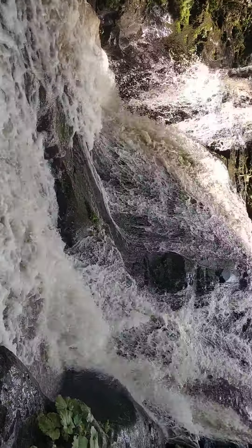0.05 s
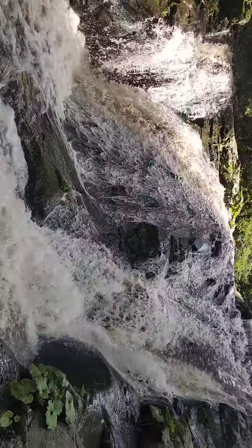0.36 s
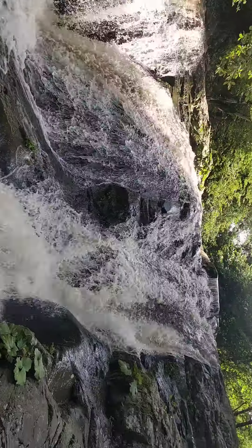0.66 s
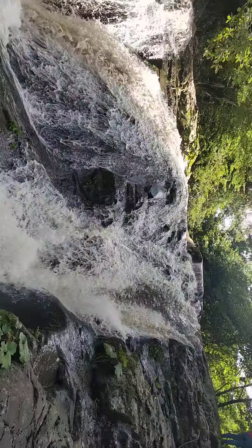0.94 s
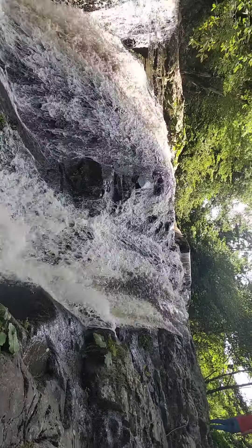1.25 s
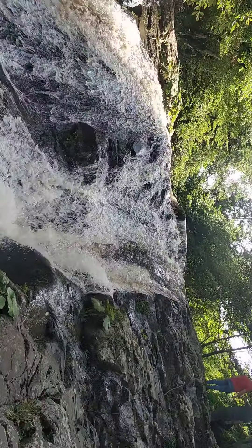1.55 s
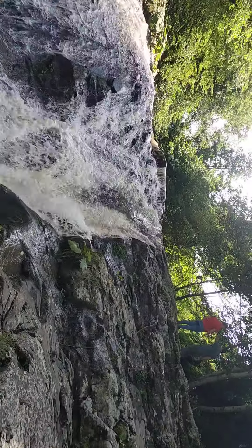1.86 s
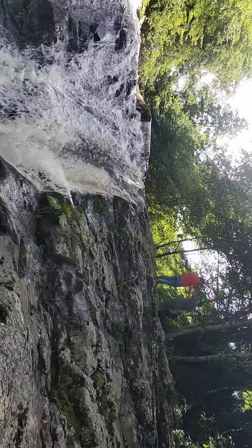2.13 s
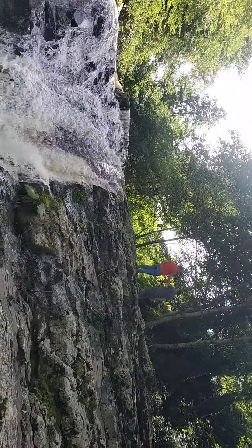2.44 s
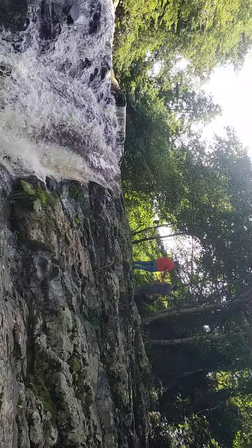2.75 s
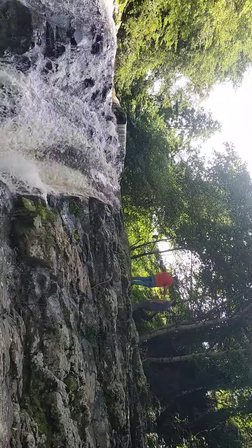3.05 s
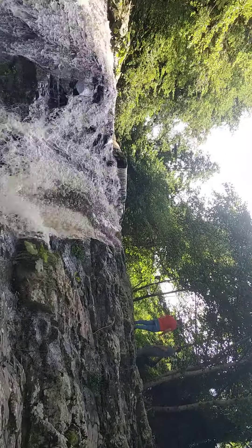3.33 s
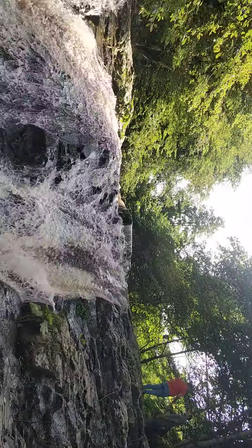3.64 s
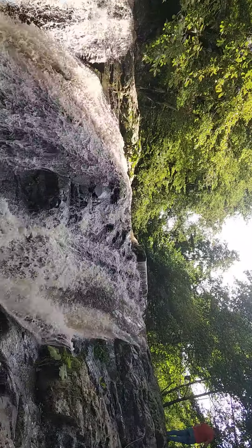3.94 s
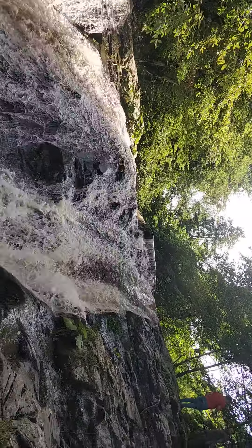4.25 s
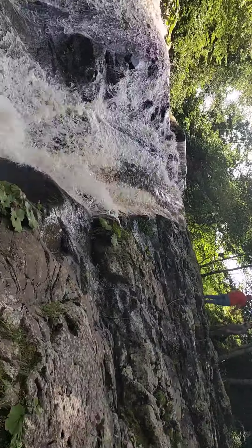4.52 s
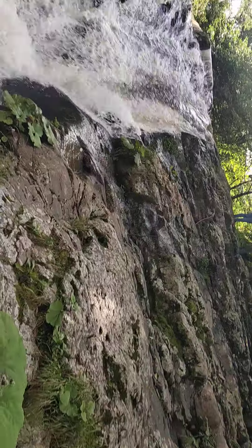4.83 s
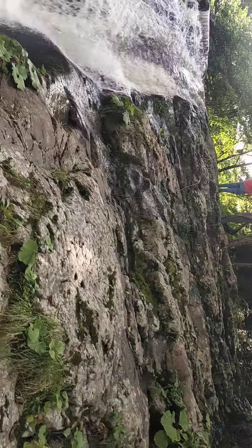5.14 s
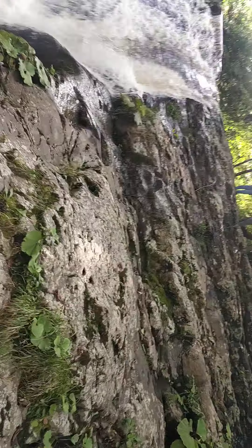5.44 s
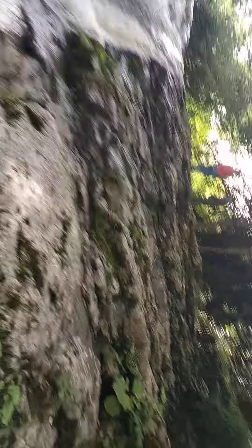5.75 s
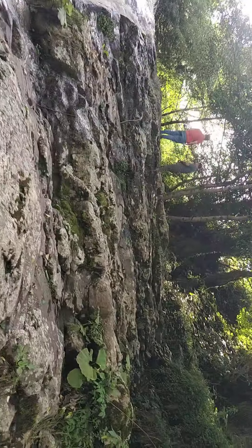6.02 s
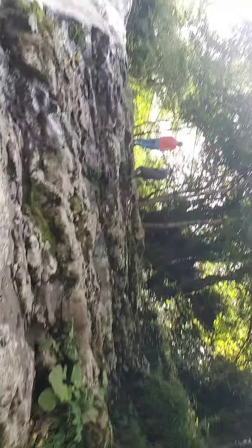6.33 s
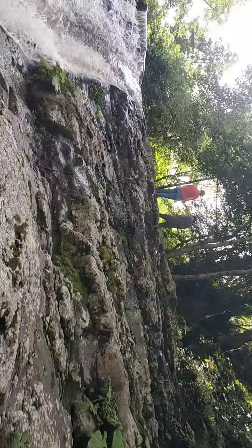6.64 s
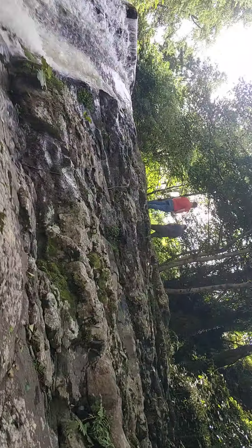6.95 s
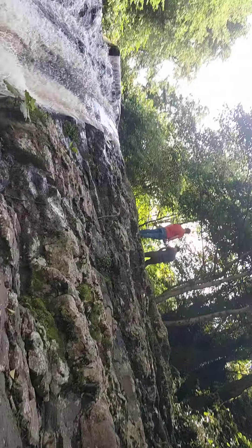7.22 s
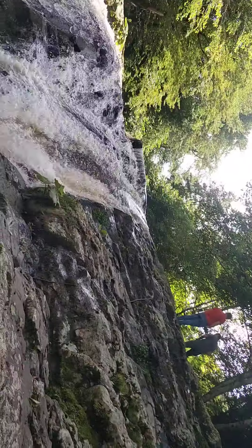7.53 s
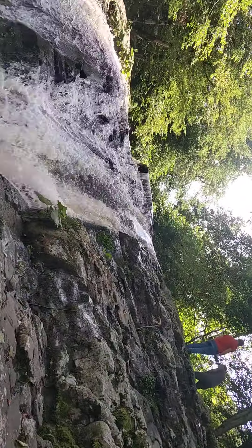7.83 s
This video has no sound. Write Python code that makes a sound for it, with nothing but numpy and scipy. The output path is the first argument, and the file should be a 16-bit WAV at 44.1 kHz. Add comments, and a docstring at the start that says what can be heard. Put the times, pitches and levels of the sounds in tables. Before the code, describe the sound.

A close waterfall rushes over rock ledges from the first moment and runs without a break for about eight seconds. Underneath, the plunge pool gives a low, uneven rumble. In the middle, foam rushes with many small bubbles, and on top, droplets hitting the rock make a bright, wide sizzle of spray.

The hand-held microphone pans, gently changing the tone. The rush is fullest and brightest until about 1.7 seconds, eases between 2 and 3 seconds, brightens again near 3.8 seconds, then softens as the microphone turns away. At about 5.4 seconds a hand slips and shades the microphone: the middle of the rush drops a little, leaving a thinner, slightly hollow sound with the hiss still present to the end. A faint burble runs through the water throughout.

```python
"""A close, bright rush of water, steady from the first moment: a waterfall pouring over rock ledges.
Underneath, big air pockets boom in the plunge pool; a sheet of foam rushes with small bubbles,
and on top, droplets slapping the rock make a wide sizzle of spray. The rush brightens whenever the
panning, hand-held microphone faces the fall; late on, the hand slips and shades it.
A mild noise suppressor adds a slight burble."""
import sys
import numpy as np
from scipy import signal
from scipy.fft import rfft, irfft
from scipy.io import wavfile
from scipy.ndimage import uniform_filter1d

SR = 44100
rng = np.random.default_rng(int(sys.argv[2]) if len(sys.argv) > 2 else 0)


def wav_record(signal):
    """Record a signal, one row per channel, as 16-bit PCM in the file named by sys.argv[1]."""
    frames = np.transpose(np.atleast_2d(signal))
    bounded = np.clip(frames, -1, 1)
    # unit amplitude maps onto the largest positive 16-bit level
    quanta = np.round(bounded * 32767).astype(np.int16)
    wavfile.write(sys.argv[1], SR, quanta)


N = 347508

# The water's tone at an open microphone. Each row: frequency in Hz, relative level in dB.
OPEN_TONE = [(450, -7), (700, -6), (1050, -6.5), (1500, -5), (2000, -2.5), (2400, -4.5), (2800, -9),
             (3500, -10), (4500, -6), (5500, -2.5), (6300, -2), (6950, -4), (8200, 0), (9400, -1)]
# Its tone with the hand shading the microphone. Each row: frequency in Hz, relative level in dB.
SHADED_TONE = [(450, 0), (660, -7.5), (950, -8), (1500, -9), (2300, -8.5), (3400, -8.5), (4500, -3.5),
               (6000, -1), (7000, -4), (8400, 2), (9400, 1.5)]
# The microphone's low bump and roll-off at both ends. Each row: frequency in Hz, gain in dB.
MIC_RESPONSE = [(25, -53), (45, -46), (70, -37), (100, -31), (130, -22), (165, -11), (200, 7.5), (235, 0),
                (285, -0.5), (9400, 0), (9900, -5.5), (10400, -14.5), (11000, -31)]
# Stereo spread of the spray. Each row: frequency in Hz, side level against mid in dB.
SPRAY_WIDTH = [(3700, -62), (4150, -22), (5400, -15.5), (6000, -10.5), (7500, -7), (9600, -8.5),
               (10500, -16)]
# How squarely the microphone faces the fall. Each row: time in seconds, share from 0 to 1.
MIC_FACING = [(0, 0.95), (0.6, 0.95), (1.75, 0.85), (2.25, 0.44), (3.2, 0.46), (3.75, 0.8), (4.3, 0.62),
              (4.9, 0.25), (6.2, 0), (7.88, 0.12)]
# The hollow between hand and housing rings. Each row: time in seconds, pitch in Hz, lift in dB.
CUP_RING = [(0, 710, 3), (2.0, 720, 2), (3.0, 690, 1.3), (4.1, 700, 1.2), (4.3, 910, 2.5), (4.55, 1170, 4),
            (5.2, 1220, 2), (6.4, 1090, 0.2), (7.88, 895, 2.5)]
# Sound glancing off the hand cancels a band, which drops as the hand closes in.
# Each row: time in seconds, centre in Hz, gain in dB.
HAND_NOTCH = [(0, 3600, -1.5), (2.3, 3620, -4), (3.8, 3480, -2.4), (4.4, 3350, -5.5), (5.15, 3280, -3.6),
              (5.26, 4320, -4.5), (5.35, 3930, -5.5), (5.41, 2020, -5), (5.62, 1880, -5.5),
              (5.85, 1900, 0.7), (6.6, 1490, -2), (7.88, 2310, -1.5)]
# The fader ride on the pool's boom. Each row: time in seconds, base level in dB.
BOOM_LEVEL = [(0, -28.5), (0.6, -32), (1.6, -31), (2.6, -33), (3.9, -31.5), (4.7, -30.5), (6.1, -30.5),
              (6.75, -32.5), (7.88, -31.5)]

FRAME, HOP = 1024, 128  # samples
HZ = np.fft.rfftfreq(FRAME, 1 / SR)
TIMES = np.arange(-(-N // HOP) + 1) * HOP / SR

FOAM_BASE_DB, FOAM_FACING_DB, FOAM_SHADED_DB = -24.5, 2, -2.3
SPRAY_BASE_DB, SPRAY_FACING_DB = -22.5, 3.3
SIZZLE_HZ, SIZZLE_FACING_DB = 8400, 3.5  # the finest spray is the most directional
HEAVE_DB, HEAVE_RATE_HZ = 1, 9.4  # the pool heaves at random
SLIP_AT_S, SLIP_EASE_S, SHADE_BEFORE_SLIP = 5.37, 0.012, 0.28
CUP_DIP_RATIO, CUP_DIP_DEPTH = 0.58, 1.5  # a dip below the ring, as multiples of its pitch and lift
NOTCH_LIFT_RATIO, NOTCH_LIFT_SHARE = 1.65, 0.3  # the reflection also lifts a band above its notch


def gain_of(db):
    """Decibels to amplitude."""
    return 10 ** (np.asarray(db) / 20)


def unit_rms(x):
    """Scales to rms 1."""
    return x / np.sqrt(np.mean(x ** 2) + 1e-20)


def over_hz(points):
    """A tone table read at every bin."""
    hz, value = np.transpose(points)
    return np.interp(np.log(HZ + 1), np.log(hz + 1), value)


def over_time(rows):
    """The columns of an automation table, read at every frame."""
    seconds, *columns = np.transpose(rows)
    return [np.interp(TIMES, seconds, column)[:, None] for column in columns]


def spectra(x):
    """Short-time spectra, frames x bins."""
    return signal.stft(x, nperseg=FRAME, noverlap=FRAME - HOP)[2].T


def waveform(channels):
    """Spectra, channels x frames x bins, back to sound."""
    return signal.istft(channels.transpose(0, 2, 1), nperseg=FRAME, noverlap=FRAME - HOP)[1][:, :N]


def bell(centre_hz, db, octaves):
    """One EQ peak or dip, in dB."""
    return db * np.exp(-.5 * (np.log2((HZ + 1) / centre_hz) / octaves) ** 2)


def below(edge_hz, order):
    """Share of the power that lies under a soft crossover."""
    return 1 / (1 + (HZ / edge_hz) ** order)


def band_gain(path, share, level_db):
    """One band of the path, scaled so that white noise comes out at the given level."""
    gain = path * np.sqrt(share)
    return gain * gain_of(level_db) / np.sqrt(np.mean(gain ** 2, axis=1, keepdims=True))


def surge(rate_hz):
    """A random swell of rms 1, with little movement faster than the given rate."""
    hz = np.fft.rfftfreq(len(TIMES), HOP / SR)
    shape = hz / (hz + 2) / np.sqrt(1 + (hz / rate_hz) ** 2)
    swell = irfft(rfft(rng.standard_normal(len(TIMES))) * shape, len(TIMES))
    return unit_rms(swell)[:, None]


def smooth_frames(field, length_s):
    """A running average over time."""
    return uniform_filter1d(field, max(1, round(length_s * SR / HOP)), axis=0)


def gushes(length_s, width_hz):
    """Random patches of rms 1 over time and frequency: each gush has its own colour."""
    field = smooth_frames(rng.standard_normal((len(TIMES), len(HZ))), length_s)
    return unit_rms(uniform_filter1d(field, max(1, round(width_hz / HZ[1])), axis=1))


def bubble_swarm(low_hz, high_hz, per_s, decay_cycles, spread_db, rise, pitches):
    """A swarm of damped rings, each climbing in pitch as its bubble nears the surface."""
    swarm = np.zeros(N)
    for hz in np.geomspace(low_hz, high_hz, pitches):
        age = np.arange(int(6 * decay_cycles * SR / hz) + 2) * hz / SR / decay_cycles  # in decay times
        ring = np.exp(-age) * np.sin(2 * np.pi * decay_cycles * age * (1 + rise * age))
        starts = np.flatnonzero(rng.random(N) < per_s / pitches / SR)
        sizes = gain_of(spread_db * np.minimum(rng.exponential(1, N)[:len(starts)], 4))
        samples = (starts[:, None] + np.arange(len(ring))).ravel()
        swarm += hz * np.bincount(samples, np.outer(sizes, ring).ravel(), N)[:N]
    return unit_rms(swarm)


def water(drops, drops_db):
    """Countless far impacts merge to noise; the nearest drops stand out of it."""
    return spectra(unit_rms(rng.standard_normal(N) + gain_of(drops_db) * drops))


def noise_suppressor(x, strength, memory_s, background_s):
    """Ducks each bin that dips under its own average and lifts those above, so the rush burbles."""
    channels = np.array([spectra(channel) for channel in x])
    power = uniform_filter1d(abs(channels.mean(0)) ** 2, size=2, axis=1)
    recent = abs(smooth_frames(power, memory_s)) + 1e-16
    background = abs(smooth_frames(power, background_s)) + 1e-16
    depth = strength * (1 - below(240, order=2))  # it leaves the deep bass almost alone
    gain = np.clip(recent / background, .1, 3) ** depth
    gain /= np.sqrt(np.sum(power * gain ** 2) / np.sum(power))  # make-up gain keeps the loudness
    return waveform(channels * gain)


def hand_slip():
    """Rises quickly from 0 to 1 as the hand slips over the microphone and stays."""
    return .5 + .5 * np.tanh((TIMES[:, None] - SLIP_AT_S) / SLIP_EASE_S)


def hand_cup():
    """The hollow of the hand rings and cancels a band below its ring; in dB."""
    ring_hz, lift_db = over_time(CUP_RING)
    dip_db = bell(CUP_DIP_RATIO * ring_hz, -CUP_DIP_DEPTH * lift_db, octaves=0.2)
    return bell(ring_hz, lift_db, octaves=0.15) + dip_db


def hand_reflection():
    """Sound bouncing off the hand carves a moving notch and lifts a band above it; in dB."""
    notch_hz, notch_db = over_time(HAND_NOTCH)
    lift_db = bell(NOTCH_LIFT_RATIO * notch_hz, -NOTCH_LIFT_SHARE * notch_db, octaves=0.2)
    return bell(notch_hz, notch_db, octaves=0.25) + lift_db


def path_to_mic(facing, covered):
    """The moving EQ between water and listener: shading, microphone, aim and hand, as a gain."""
    shade = SHADE_BEFORE_SLIP + (1 - SHADE_BEFORE_SLIP) * covered
    tone_db = (1 - shade) * over_hz(OPEN_TONE) + shade * over_hz(SHADED_TONE)
    sizzle_db = bell(SIZZLE_HZ, SIZZLE_FACING_DB * facing ** 2, octaves=0.1)
    return gain_of(tone_db + over_hz(MIC_RESPONSE) + sizzle_db + hand_cup() + hand_reflection())


def plunge_pool(gain):
    """The low bed: heavy water drives big air pockets into the pool, in lumps."""
    pockets = bubble_swarm(173, 512, per_s=110, decay_cycles=7.1, spread_db=0.5, rise=0.025, pitches=14)
    lumps_db = 1.2 * gushes(length_s=0.1, width_hz=130)
    return gain * water(pockets, drops_db=-25) * gain_of(lumps_db - 0.22)


def foam(gain):
    """The body: white water tumbles down the ledges, full of small bubbles."""
    bubbles = bubble_swarm(549.5, 3810, per_s=700, decay_cycles=17.2,
                           spread_db=1.5, rise=0.013, pitches=40)
    gushes_db = 0.12 * surge(rate_hz=17) + 0.46 * gushes(length_s=0.074, width_hz=260)
    return gain * water(bubbles, drops_db=-16.0) * gain_of(gushes_db - 0.5)


def spray(gain):
    """The bright top: sheets of droplets slap the rock in quick flurries; returns mid and side."""
    droplets = bubble_swarm(3930, 10800, per_s=3500, decay_cycles=3.8,
                            spread_db=1.0, rise=0.0088, pitches=16)
    fineness = HZ / 8000  # the finest spray flutters most
    flurries_db = 0.55 * surge(rate_hz=30) + 0.92 * fineness * gushes(length_s=0.026, width_hz=1200)
    gain = gain * gain_of(flurries_db - 0.8)
    mid = gain * water(droplets, drops_db=-7.5)
    side = gain * gain_of(over_hz(SPRAY_WIDTH)) * spectra(rng.standard_normal(N))
    return mid, side


def scene():
    """Pool and foam in the centre, spray spread wide, all heard along one path."""
    facing, covered = over_time(MIC_FACING)[0], hand_slip()
    pool_db = over_time(BOOM_LEVEL)[0] + HEAVE_DB * surge(rate_hz=HEAVE_RATE_HZ)
    foam_db = FOAM_BASE_DB + FOAM_FACING_DB * facing + FOAM_SHADED_DB * covered
    spray_db = SPRAY_BASE_DB + SPRAY_FACING_DB * facing
    path = path_to_mic(facing, covered)
    lows, highs = below(550, order=10), 1 - below(4000, order=12)
    sizzle, side = spray(band_gain(path, highs, spray_db))
    boom = plunge_pool(band_gain(path, lows, pool_db))
    rush = foam(band_gain(path, (1 - lows) * (1 - highs), foam_db))
    mid = boom + rush + sizzle
    return waveform(np.array([mid + side, mid - side]))


def record(dry):
    """The output chain: mild noise suppressor, rumble filter and a steep high cut."""
    wet = noise_suppressor(dry, strength=.27, memory_s=.032, background_s=.25)
    wet = signal.sosfilt(signal.butter(1, 48, "highpass", fs=SR, output="sos"), wet)
    high_cut = signal.firwin(511, cutoff=11150, window=("kaiser", 9), fs=SR)
    return signal.oaconvolve(wet, high_cut[None], "same")


dry = scene()
out = record(dry)
wav_record(out)
```